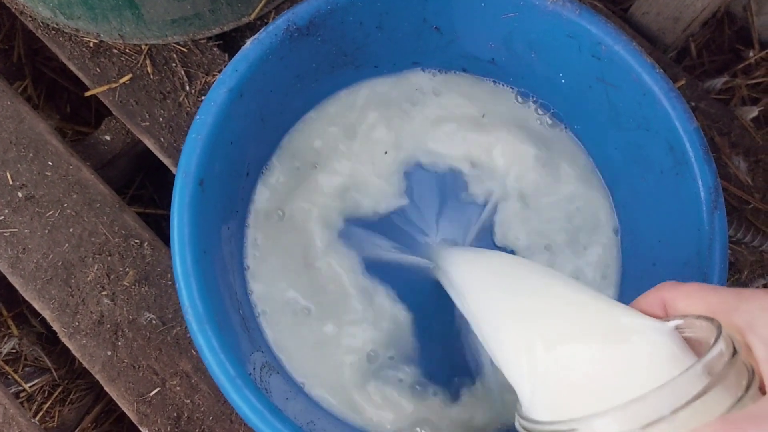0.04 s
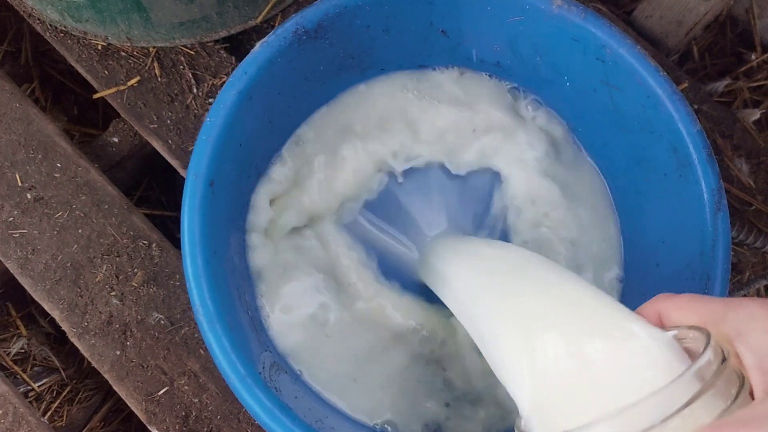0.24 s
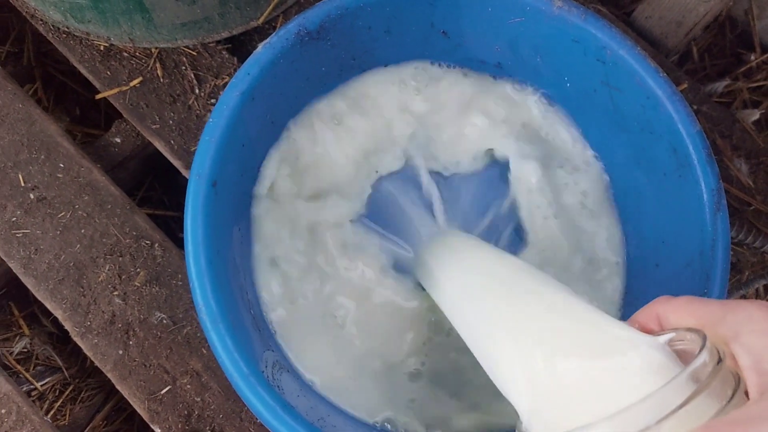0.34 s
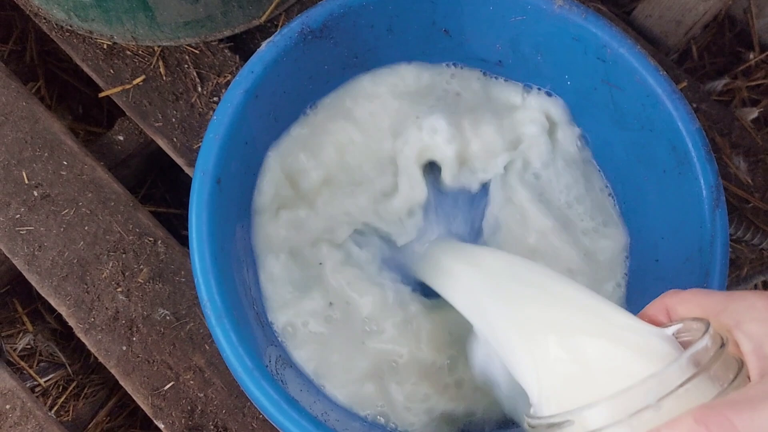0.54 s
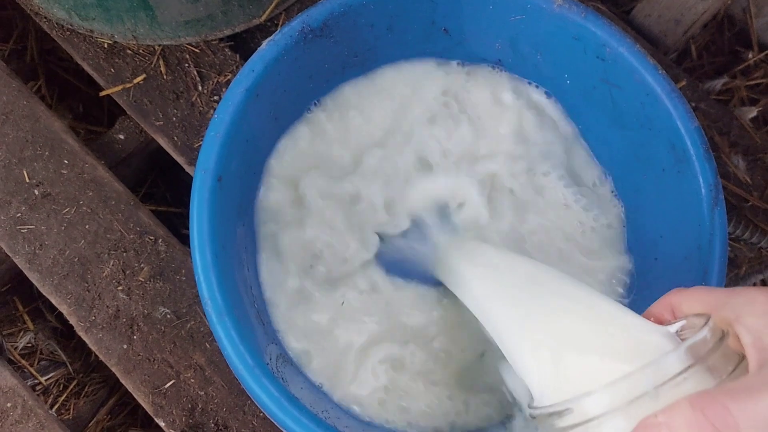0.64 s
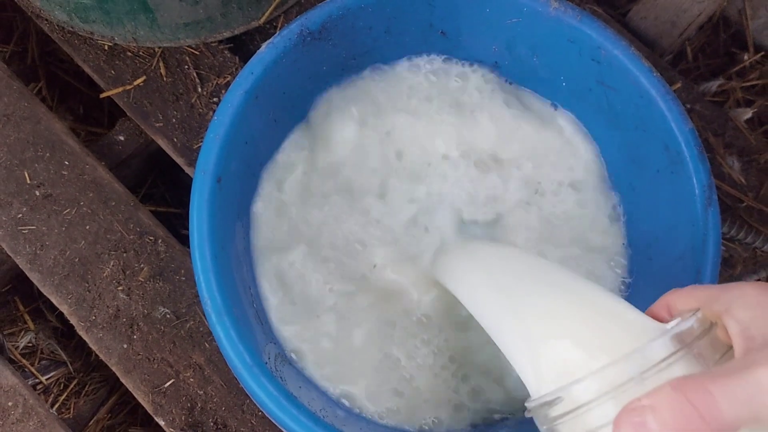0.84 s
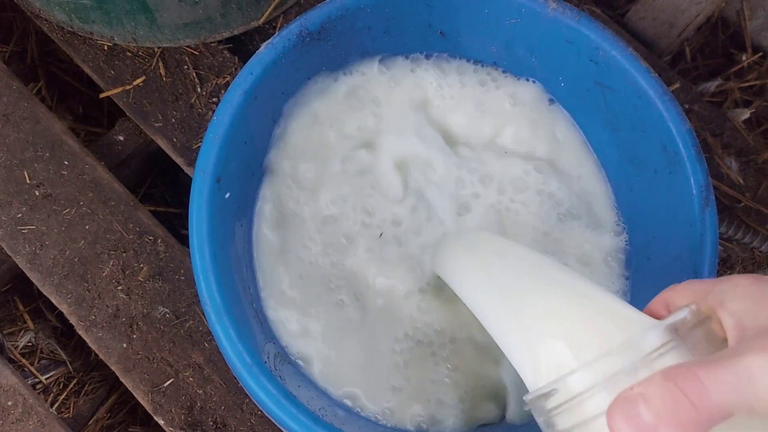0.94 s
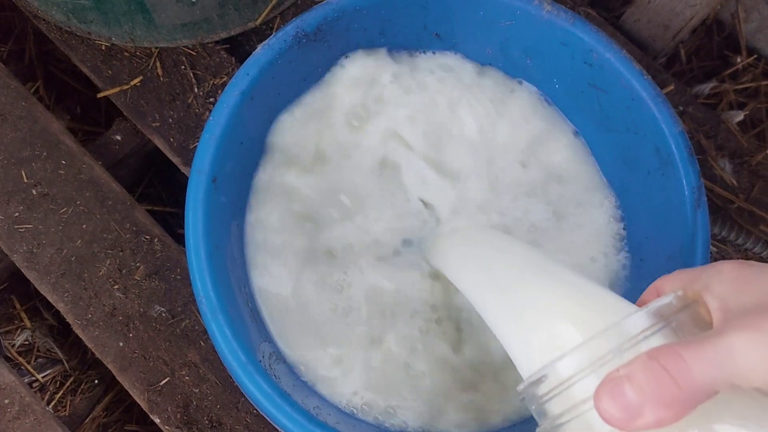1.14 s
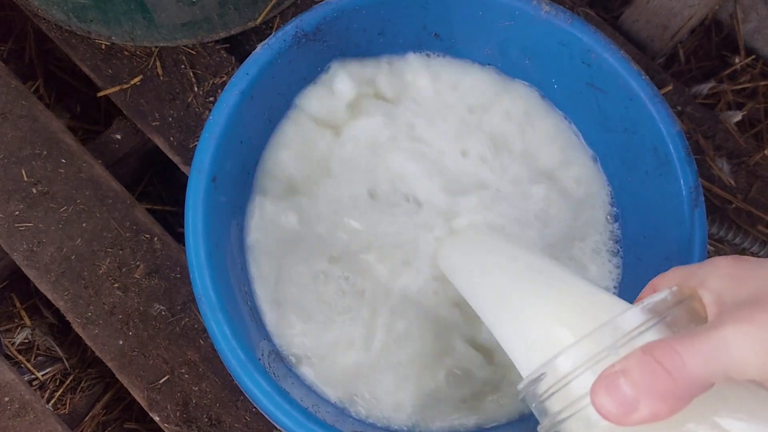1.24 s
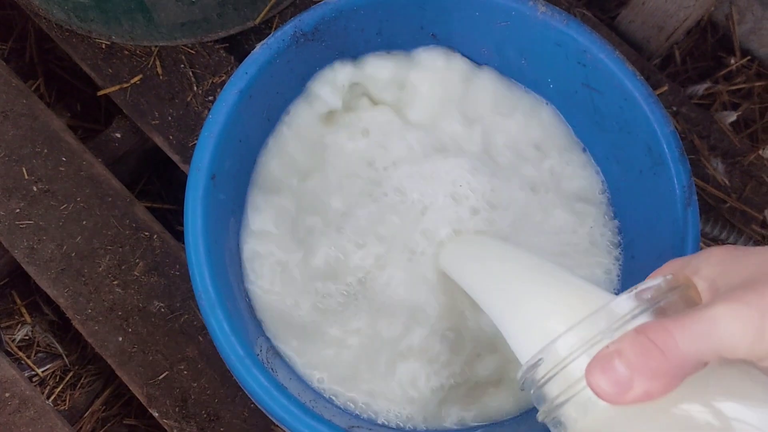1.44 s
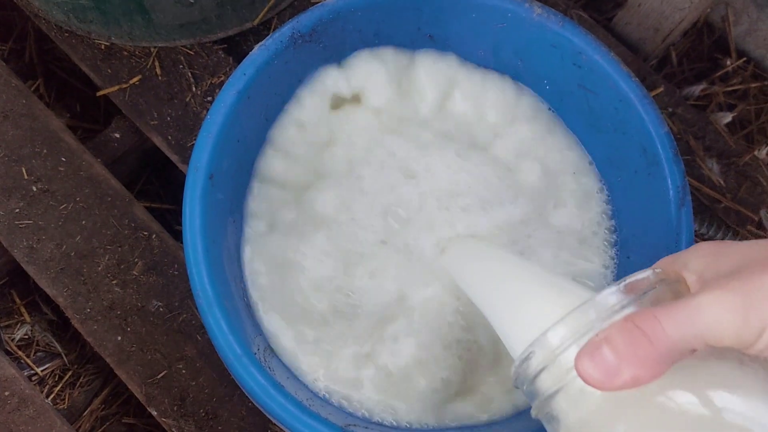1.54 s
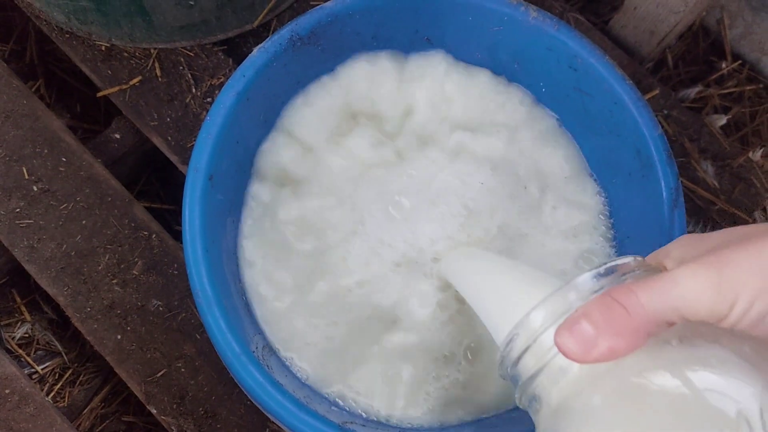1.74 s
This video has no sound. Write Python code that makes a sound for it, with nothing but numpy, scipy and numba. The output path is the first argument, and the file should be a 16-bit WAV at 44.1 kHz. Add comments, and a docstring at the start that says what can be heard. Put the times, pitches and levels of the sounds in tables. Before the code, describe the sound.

Liquid poured from a jar starts almost silently, swells to busy splashing over a drumming plastic bowl, gulps deeply, splashes on brightly, then dwindles to a few plinks, heard close up outdoors with a short diffuse echo.

```python
"""A thick stream of milky liquid is poured from a glass jar into a plastic bowl of water, outdoors and close by.
Bubbles are short decaying sines: dense random swarms for the bubbling, placed ones for plinks, gulps and pops.
Coloured noise gives slaps, spray hiss and faint air; noise through low resonances gives the drumming bowl.
The hollow around the stream closes with a gulp and two soft thumps; then the pour eases and the splashing
thins to single plinks. A short diffuse echo of the yard and a low wavering hum surround it."""
import sys
import numpy as np
from scipy import signal
from scipy.fft import rfft, irfft
from scipy.io import wavfile
from numba import njit

SR = 44100
rng = np.random.default_rng(int(sys.argv[2]) if len(sys.argv) > 2 else 0)


def transcribe(signal):
    """Save signal, clipped to [-1, 1], as a 16-bit WAV file at the path in sys.argv[1]."""
    frames = np.atleast_2d(signal).T
    limited = np.clip(frames, -1, 1)
    pcm = np.round(limited * 32767).astype(np.int16)
    wavfile.write(sys.argv[1], SR, pcm)


N = 79380  # samples, 1.8 s


def undb(db):
    """Amplitude gain is ten to the power of decibels over twenty."""
    return 10 ** (np.asarray(db) / 20)


def unit(x):
    """Normalise a stereo sound so that the mean of its two channels has rms 1."""
    middle = x.mean(0)
    return x / np.sqrt(np.mean(middle ** 2))


def follow(table):
    """Envelope: gain over time, linear in decibels between (s, dB) rows."""
    seconds, db = np.array(table).T
    return undb(np.interp(np.arange(N) / SR, seconds, db))


def pan(db):
    """Interaural level difference: left and right gains, left louder when positive."""
    return undb(np.array([[db], [-db]]) / 2)


def colour(x, points):
    """Linear filtering: multiply the spectrum by (Hz, dB) points joined on a logarithmic frequency axis."""
    hz, db = np.array(points).T
    f = np.maximum(np.fft.rfftfreq(2 * N, 1 / SR), 1)
    gain = undb(np.interp(np.log(f), np.log(hz), db))
    return irfft(rfft(x, 2 * N) * gain)[..., :N]


@njit
def ring(start, hz, size, cycles, rise, swell):
    """Damped oscillators: sum of sines that swell, fade exponentially and rise in pitch."""
    out = np.zeros(N)
    for k in range(len(start)):
        fade = cycles[k] / hz[k]  # seconds to fall by 1/e
        first = max(0, int(start[k] * SR) + 1)
        last = min(N, int((start[k] + 6 * fade) * SR))
        for i in range(first, last):
            u = (i / SR - start[k]) / fade  # time in fading times
            envelope = np.exp(-u) * (1 - np.exp(-u / swell))
            phase = 2 * np.pi * cycles[k] * u * (1 + rise * u / 2)
            out[i] += size[k] * envelope * np.sin(phase)
    return out


def scatter(start, hz, size, cycles, rise, swell, spread=1):
    """Binaural cues and reflection: each ring has its own lag and balance, and an echo from the wall per ear."""
    lag_s, balance_db = .0001, 3.0  # standard deviations between the ears, at spread 1
    wall_lag_s, wall_db, wall_low_hz = .0015, -2.5, 710  # typical delay; high-pitch gain at spread 1; half gain
    lag, side, far_left, far_right = rng.standard_normal((len(start), 4)).T

    def sound(when, gain):
        return ring(when, 1. * hz, size * gain, 1. * cycles, float(rise), float(max(swell, .001)))

    wall_gain = spread * undb(wall_db) * hz / (hz + wall_low_hz)  # weaker for low pitches
    ears = []
    for sign, far in ((-1, far_left), (1, far_right)):
        direct = sound(start + sign * spread * lag * lag_s / 2, undb(sign * spread * side * balance_db / 2))
        echo = sound(start + wall_lag_s * np.exp(far / 2), wall_gain)
        ears.append(direct + echo)
    return np.array(ears)


def swarm(low_hz, high_hz, cycles, uneven_db, rise, count):
    """Random superposition: many rings, mostly weak and a few strong, with equal direct power per Hz."""
    when, pitch, strength, length = rng.random((count, 4)).T
    hz = low_hz * (high_hz / low_hz) ** pitch
    # pitches crowd towards the low end and low rings last longer, so size grows with pitch
    size = hz * undb(-uneven_db * np.log(np.maximum(strength, .015)))
    ring_cycles = cycles * 2 ** (2 * length - 1)
    return scatter(when * N / SR, hz, size, ring_cycles, rise, swell=0.029)


def surging():
    """Amplitude modulation: a stream that arrives in uneven gushes, as random gains joined in decibels."""
    rate_hz, depth_db = 35.06, 0.98  # new random levels per second, and their standard deviation
    position = np.arange(N) / SR * rate_hz
    return undb(depth_db * np.interp(position, np.arange(N), rng.standard_normal(N)))


def bubbling(surge):
    """Bubble resonance: the stream folds air into the water, and a swarm of small bubbles rings."""
    # Strength of the pour. Each row: time in seconds, level in dB before the surge and trim.
    pour = [(0, -63), (.075, -89), (.105, -61), (.14, -52.5), (.2, -55), (.235, -45.5), (.29, -44.5),
            (.36, -47), (.48, -42), (.53, -39), (.59, -36.5), (.62, -44), (.648, -39.5), (.675, -40),
            (.72, -37.5), (.765, -37), (.8, -40), (.87, -50.5), (.905, -41.5), (1.0, -42.5), (1.035, -39),
            (1.085, -39.5), (1.115, -36.5), (1.2, -40), (1.255, -43.5), (1.33, -44), (1.42, -49.5),
            (1.48, -53.5), (1.565, -62), (1.605, -57), (1.64, -62.5), (1.7, -58), (1.8, -71)]
    # Colour applied to the swarm. Each row: frequency in Hz, relative gain in dB.
    bubble_colour = [(100, -29), (300, -26.5), (430, -11.5), (600, -5.5), (780, -7), (930, -0.5),
                     (1150, -4.5), (1600, 0.5), (2100, 0.5), (2500, -3.5), (3100, -5.5), (4500, -10),
                     (6500, -32), (12000, -41)]
    cloud = swarm(low_hz=328.2, high_hz=6970, cycles=6.3, uneven_db=3.0, rise=0.0508, count=4600)
    return unit(colour(cloud, bubble_colour)) * follow(pour) * surge * undb(-1.5) * pan(db=0.1)


def spray(surge):
    """Many brief impulses merge into noise: tiny drops and bursting foam crackle over a soft hiss."""
    # Strength of the spray. Each row: time in seconds, level in dB before the surge and trim.
    spraying = [(0, -74.5), (.075, -71.5), (.145, -60.5), (.185, -59.5), (.235, -48), (.28, -51.5),
                (.36, -50), (.43, -48.5), (.57, -45.5), (.62, -51.5), (.72, -44), (.81, -54), (.92, -52),
                (1.01, -52), (1.07, -49.5), (1.17, -50.5), (1.27, -56), (1.35, -58.5), (1.41, -66.5),
                (1.445, -65), (1.6, -69.5), (1.8, -74)]
    # Colour of crackle and hiss together. Each row: frequency in Hz, relative gain in dB.
    spray_colour = [(1000, 4), (3000, 5.5), (5000, 3), (7000, 0), (8300, -4), (9500, -3.5), (11000, -2.5),
                    (13000, -2), (16000, -7)]
    crackle = unit(swarm(low_hz=2960, high_hz=16200, cycles=2.38, uneven_db=4.0, rise=0.028, count=3600))
    hiss = undb(-4.0) * unit(rng.standard_normal((2, N)))
    return unit(colour(crackle + hiss, spray_colour)) * follow(spraying) * surge * undb(3.0) * pan(db=3.5)


def bowl():
    """Forced modal resonance: the uneven push of the stream, as noise, rings the low modes of the bowl."""
    # Drumming of the stream on the bowl. Each row: time in seconds, level in dB.
    drumming = [(0, -83.5), (.1, -76), (.2, -75), (.28, -54), (.42, -60), (.55, -55), (.66, -51),
                (.72, -49), (.82, -56.5), (.94, -52), (1.2, -53), (1.34, -56), (1.42, -68), (1.57, -74.5),
                (1.8, -83)]
    # Modes of the filled bowl. Each row: frequency in Hz, relative level in dB, 60 dB decay time in seconds.
    modes = [(238.1, 0.5, 0.25), (262, -3, 0.3), (301, -7.5, 0.22), (367.5, -16, 0.26), (550, -14.5, 0.08)]
    t = np.arange(SR // 2) / SR
    body = np.zeros(len(t))
    for hz, db, t60 in modes:
        # the root of the decay time keeps a long mode from gaining power
        body += undb(db) * np.sin(2 * np.pi * hz * t) * undb(-60 * t / t60) / np.sqrt(t60)
    push = rng.standard_normal(N) + undb(-25.0) * rng.standard_normal((2, N))  # nearly the same in both ears
    ringing = signal.fftconvolve(push, body[None], axes=1)[:, :N]
    return unit(ringing) * follow(drumming) * pan(db=-1.5)


def bottom():
    """Repeated impact: mainly until the hollow closes, the stream beats low patters on the bare bottom."""
    # Strength of the beating. Each row: time in seconds, level in dB.
    beating = [(.09, -77), (.14, -57.5), (.24, -58), (.44, -54.5), (.55, -52), (.72, -45.5), (.82, -57),
               (.95, -83)]
    # Colour applied to the patters. Each row: frequency in Hz, relative gain in dB.
    patter_colour = [(70, -39), (125, 1), (190, -6), (290, 1.5), (360, 4), (430, -12), (560, -1.5),
                     (800, -4.5), (1100, -24)]
    patter = swarm(low_hz=108.8, high_hz=902, cycles=2.9, uneven_db=2.0, rise=0.027, count=700)
    return unit(colour(patter, patter_colour)) * follow(beating)


def outdoors():
    """Partly correlated noise makes the faint air; an amplitude-modulated sine makes a low hum that wavers."""
    # Spectrum of the air. Each row: frequency in Hz, relative level in dB per Hz.
    air_colour = [(20, -24), (45, -6), (75, 2), (130, 5.5), (250, -15.5), (500, -22), (1150, -35),
                  (1750, -2), (2100, -15), (2700, -36), (7000, -27), (16000, -22.5)]
    # Strength of the hum. Each row: time in seconds, amplitude in dB before the waver.
    hum_level = [(0, -69.5), (.45, -74), (.56, -62), (1.1, -59.5), (1.3, -61.5), (1.6, -67.5),
                 (1.77, -58.5)]
    air_db, hum_hz = -69, 74.2
    air = unit(colour(rng.standard_normal(N) + undb(-1.0) * rng.standard_normal((2, N)), air_colour))
    waver = unit(colour(rng.standard_normal((1, N)), [(12, 11), (30, -43), (60, -100)]))
    hum = np.sin(2 * np.pi * hum_hz * np.arange(N) / SR) * (1 + waver / 2)
    return undb(air_db) * air + follow(hum_level) * hum


def plinks():
    """Bubble resonance: single larger bubbles ring out of the swarm, rising slightly in pitch."""
    # Each row: start in seconds, pitch in Hz, level in dB before the swell, cycles to fade by 1/e.
    bubbles = [(.053, 1660, -45.5, 7.5), (.117, 1980, -42, 12), (.142, 1020, -44, 10), (.223, 900, -37, 6),
               (0.251, 3180, -30.5, 15), (0.336, 1436, -30.5, 11.5), (.428, 1310, -38, 11),
               (.454, 922, -32.5, 7.3), (0.529, 2680, -22, 5.7), (0.541, 3040, -26.5, 9.1),
               (0.584, 1550, -24, 4.1), (.640, 1990, -30.5, 5.8), (.646, 3130, -26, 8.2),
               (.761, 2940, -27, 9), (0.763, 1510, -33, 11), (0.892, 4230, -30, 13),
               (0.908, 1164, -26.5, 3.9), (.951, 3900, -31.5, 8.5), (1.021, 1664, -27, 4.3),
               (1.038, 2870, -35, 11), (1.049, 2870, -26, 10), (1.104, 1574, -24, 8.2),
               (1.122, 1830, -18, 3.4), (1.129, 4800, -27, 18), (1.164, 1530, -25, 2.9),
               (1.193, 3470, -30, 9.1), (1.199, 903, -24, 3.1), (1.233, 1534, -28, 8.3),
               (1.272, 1560, -30, 4.5), (1.301, 1186, -28.5, 3), (1.314, 1590, -28, 7),
               (1.343, 3790, -27.5, 4.3), (1.370, 2280, -30, 7.6), (1.398, 3190, -31.5, 14.6),
               (1.447, 2070, -38, 8), (1.467, 1950, -37, 8.5), (1.471, 986, -37, 3.6),
               (1.481, 1630, -39, 6.6), (1.506, 1506, -36, 5.4), (1.563, 3080, -47, 11),
               (1.5891, 1535, -34, 4.8), (1.654, 1260, -48, 9), (1.676, 1490, -42, 4.2),
               (1.6988, 1340, -38.5, 3.7), (1.731, 1883, -45.5, 10.6), (1.765, 1807, -47.5, 13)]
    start, hz, db, cycles = np.array(bubbles).T
    # rise: share of the pitch per fading time; swell: share of the fading time
    return scatter(start, hz, undb(db), cycles, rise=0.022, swell=0.45, spread=0.63)


def droplets():
    """Impact ringing with noise modulation: thrown drops land with a bright, rough tick."""
    # Each row: start in seconds, pitch in Hz, level in dB before swell, roughness and panning.
    drops = [(.0935, 8850, -41), (0.2838, 9600, -19), (0.2985, 6950, -35), (.321, 5340, -28.5),
             (.3765, 14900, -30), (0.41, 8200, -32), (.4285, 15000, -30), (0.494, 8300, -32),
             (0.589, 9100, -23.5), (0.847, 7800, -30), (1.023, 3790, -32), (1.0617, 9390, -20.5),
             (1.075, 9500, -37), (1.138, 5900, -30), (1.1696, 12800, -22.5), (1.195, 11400, -34),
             (1.234, 8100, -37), (1.431, 9100, -47), (1.444, 5400, -44), (1.509, 11100, -40.5),
             (1.724, 8200, -47)]
    start, hz, db = np.array(drops).T
    depth = .5
    flutter = unit(colour(rng.standard_normal((2, N)), [(900, -17), (3500, -29)]))
    rough = (1 + depth * flutter) / (1 + depth)
    cycles = np.full(len(hz), 8.8)
    ticks = scatter(start, hz, undb(db), cycles, rise=0.013, swell=0.13, spread=0.24)
    return ticks * rough * pan(db=4)


def slaps():
    """Broadband impact: each fold of the stream slaps the surface with a short, fading burst of noise."""
    # Each row: start in seconds, level in dB before panning.
    folds = [(0.094, -53), (0.141, -43), (0.235, -40), (0.272, -37), (.385, -40.5), (.429, -39.5),
             (0.503, -34.5), (0.587, -38), (0.645, -34.5), (0.7437, -40), (0.761, -41), (0.85, -37),
             (.893, -42), (.952, -41), (1.0219, -35), (1.075, -35), (1.13, -34), (1.138, -38), (1.163, -40),
             (1.197, -32), (1.234, -36), (1.275, -38), (1.339, -45), (1.449, -41.5), (1.48, -48.5),
             (1.508, -55), (1.579, -50)]
    # Spectrum of a slap. Each row: frequency in Hz, relative level in dB per Hz.
    slap_colour = [(200, -1), (500, -15.5), (1000, 3), (2000, 2.5), (4000, -5.5), (7000, -10.5),
                   (16000, -25)]
    fade_s = 0.0038  # time to fall by 1/e
    t = np.arange(N) / SR
    hits = sum(undb(db) * (t > start) * np.exp(-np.abs(t - start) / fade_s) for start, db in folds)
    noise = rng.standard_normal(N) + undb(-2.5) * rng.standard_normal((2, N))
    return unit(colour(noise, slap_colour)) * hits * pan(db=-0.2)


def gulps():
    """Large-cavity resonance: the hollow collapses and swallows big air pockets, which ring low and briefly."""
    # Each row: start in seconds, pitch in Hz, level in dB before the swell, cycles to fade by 1/e.
    pockets = [(0.6915, 562, -13.5, 2.93), (.696, 273, -18.5, 2.06), (0.743, 74, -26, 1.28),
               (.864, 187, -37, 2.5), (0.867, 77.6, -32.5, 1.6)]
    start, hz, db, cycles = np.array(pockets).T
    return scatter(start, hz, undb(db), cycles, rise=0.01, swell=0.79, spread=0.19)


def pops():
    """Sudden release: a bubble bursting at the surface starts sharply and dies within a few cycles."""
    # Each row: start in seconds, pitch in Hz, level in dB before swell and panning.
    bursts = [(0.7427, 2880, -19.5), (1.022, 1930, -30.5), (1.124, 6750, -18.5), (1.6408, 3620, -41.5)]
    start, hz, db = np.array(bursts).T
    cycles = np.full(len(hz), 3.7)
    return scatter(start, hz, undb(db), cycles, rise=0.014, swell=0.066, spread=0.43) * pan(db=2.5)


def reflect(x, t60):
    """Diffuse reverberation: convolve with decaying noise, different in each ear and weak in the bass."""
    t = np.arange(N) / SR
    tail = rng.standard_normal((2, N)) * undb(-60 * t / t60) * (t > .004)  # silent for the first 4 ms
    tail /= np.sqrt(np.sum(tail ** 2) / 2)  # unit energy per ear
    tail = colour(tail, [(150, -18), (600, -1.5), (1500, 2.5), (4000, 5), (9000, 6)])
    return signal.fftconvolve(x.mean(0)[None], tail, axes=1)[:, :N]


def scene():
    """Superposition: all the splashing, its faint echo from the yard, and the outdoor background."""
    surge = surging()
    water = bubbling(surge) + spray(surge) + bowl() + bottom()
    water = water + plinks() + droplets() + slaps() + gulps() + pops()
    yard = undb(-10.5) * reflect(water, t60=0.15)
    return water + yard + outdoors()


def record(dry):
    """Low-pass filtering: a steep elliptic filter cuts the top above 16 kHz."""
    lowpass = signal.ellip(10, .2, 70, 16000, fs=SR, output="sos")  # order, ripple dB, rejection dB, edge Hz
    return signal.sosfilt(lowpass, dry)


dry = scene()
out = record(dry)
transcribe(out)
```